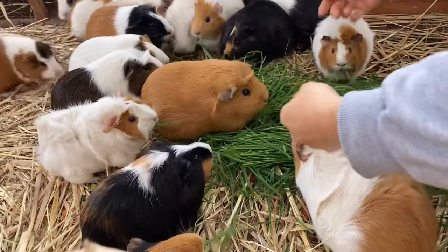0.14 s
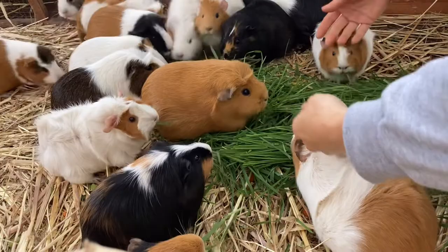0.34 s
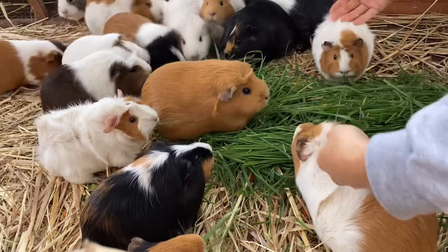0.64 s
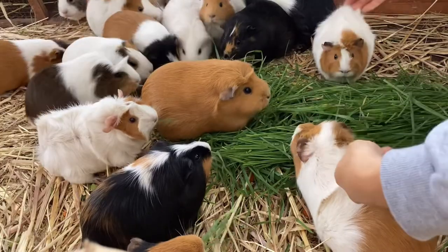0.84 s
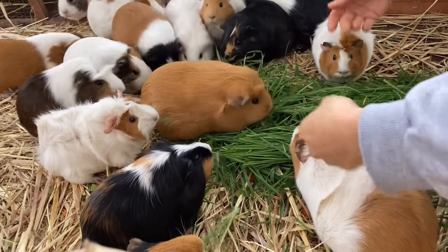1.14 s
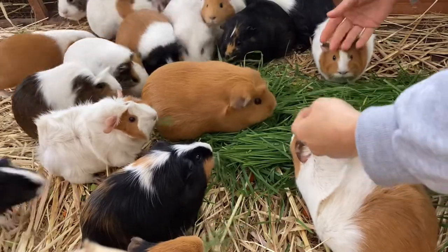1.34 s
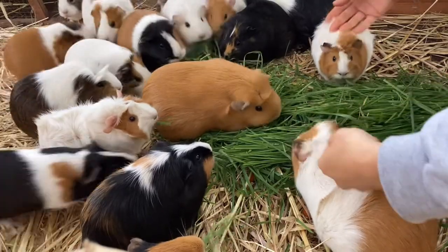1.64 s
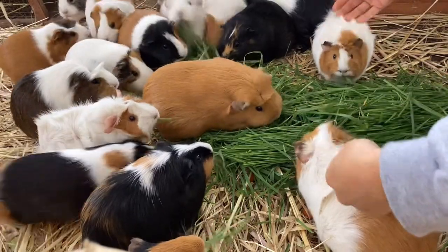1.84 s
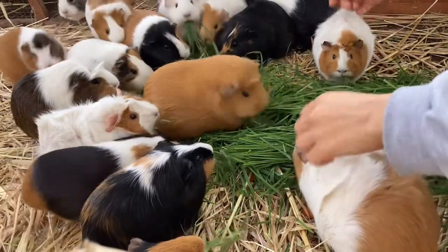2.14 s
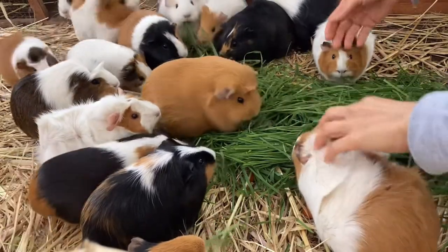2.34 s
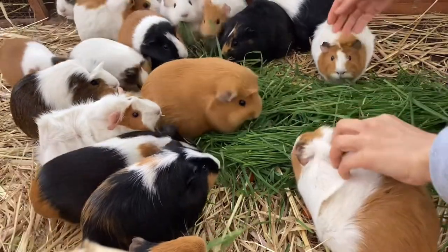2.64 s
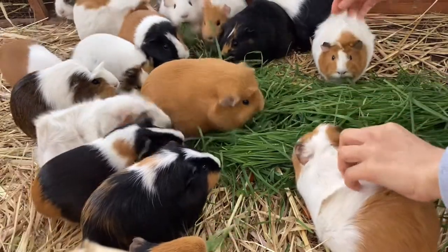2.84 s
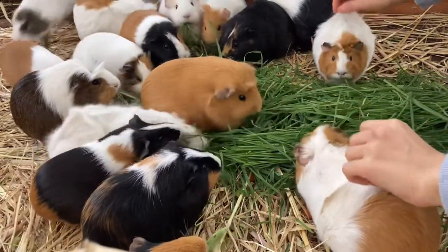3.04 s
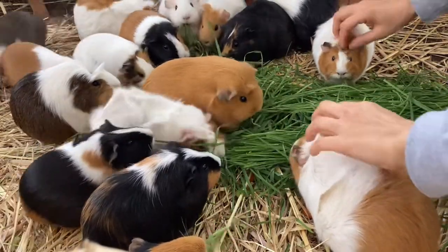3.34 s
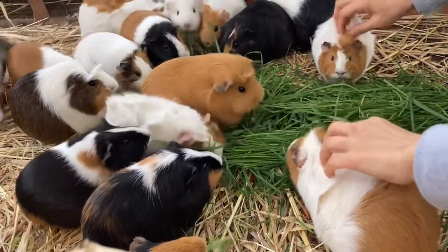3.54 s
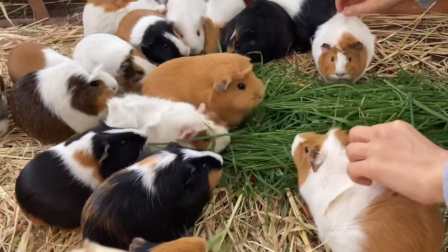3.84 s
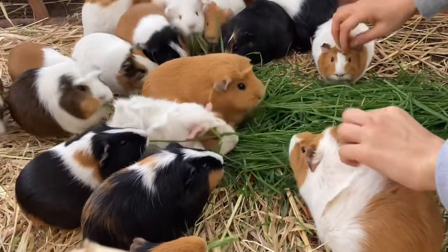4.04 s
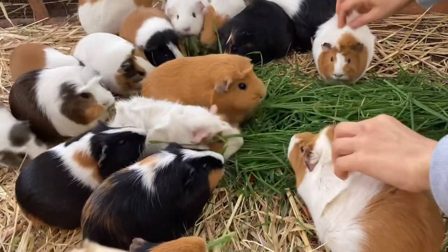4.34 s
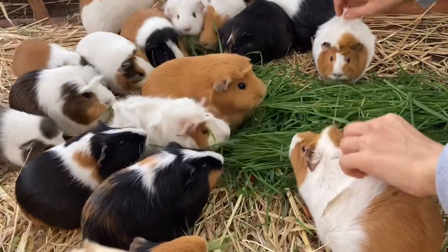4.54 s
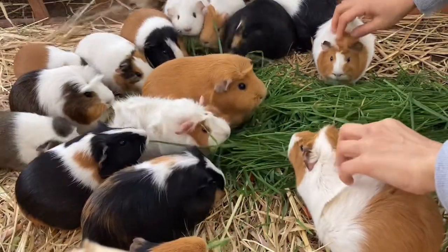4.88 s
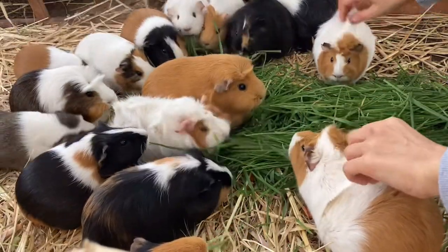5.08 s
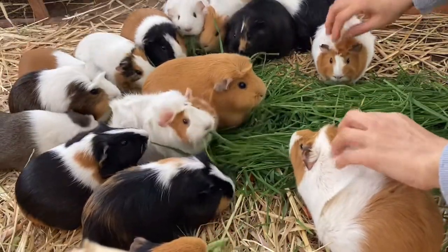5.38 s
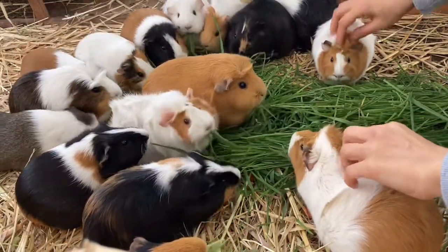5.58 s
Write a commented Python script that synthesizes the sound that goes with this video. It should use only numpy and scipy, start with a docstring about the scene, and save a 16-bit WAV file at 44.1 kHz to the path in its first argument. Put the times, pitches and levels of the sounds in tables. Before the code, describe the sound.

Close stereo pickup of a guinea pig herd in a straw pen outdoors. Low rolling purrs sound at the start, before one second, around two and around three. Faint mutters thicken in the middle, dry stalks crack, wind rumbles and thumps, grass briefly tears, and cloth scuffs strongly near the end.

```python
"""A guinea pig purrs in four short trains of low throat pulses, each a brief tone that swells and rises in pitch.
It is outdoors on straw and grass, close to a small stereo microphone; others mutter in gliding notes and squeak softly.
Straw rustles as coloured noise with tiny cracks, and snaps, clicks and tears in short bursts.
A sleeve brushes as fluttering noise, loudest near the end; two dull bumps ring the microphone housing.
Low noise and slow swings make the wind on the microphone, over a faint two-tone drone and quiet air."""
import sys
import numpy as np
from scipy import signal
from scipy.fft import rfft, irfft
from scipy.io import wavfile
from scipy.ndimage import uniform_filter1d

SR = 44100
rng = np.random.default_rng(int(sys.argv[2]) if len(sys.argv) > 2 else 0)


def digitize_waveform(pressure):
    """Quantize a signal to 16-bit integers and store it at the path in sys.argv[1].

    Rows of a 2-D input are taken as channels; values are limited to [-1, 1].
    """
    field = np.atleast_2d(pressure).T
    bounded = np.clip(field, -1, 1)
    quanta = np.round(bounded * 32767).astype(np.int16)
    wavfile.write(sys.argv[1], SR, quanta)


N = 251811
TIME = np.arange(N) / SR
HZ = np.fft.rfftfreq(N, 1 / SR)

# Throat pulses in four trains: (time at the crest [s], relative level [dB], pitch [Hz], length [s])
PURR_PULSES = [(0.038, -39.5, 337, 0.037), (.105, -42, 371, 0.023), (.179, -42, 351, 0.038),
               (0.716, -45, 350, .027), (0.738, -51.5, 367, 0.056), (0.763, -42, 347, .022),
               (0.82, -41, 359, 0.029), (.878, -40.5, 366, 0.025), (0.938, -43, 376, 0.032),
               (1.003, -43.5, 368, .031), (1.801, -56, 366, 0.027), (1.859, -49.5, 389, 0.027),
               (1.916, -49.5, 365, .029), (1.974, -40.5, 343, 0.027), (2.03, -40.5, 346, 0.03),
               (2.081, -51, 380, 0.027), (2.097, -38.5, 331, .024), (2.156, -44, 360, 0.029),
               (2.221, -46.5, 351, .038), (2.281, -47, 361, .026), (2.782, -48.5, 350, 0.023),
               (2.836, -46.5, 362, 0.024), (2.894, -41.5, 350, 0.024), (2.953, -40, 353, 0.025),
               (3.010, -42.5, 353, 0.032), (3.074, -54, 383, 0.027), (3.151, -58.5, 370, .025)]
PURR_JITTER = .045  # rms share of the pitch
PURR_SECOND_DB, PURR_THIRD_DB = -25, -28  # harmonics against the first
PURR_RASP_DB, PURR_WET_DB = -17, -10

# Soft muttered notes: (start [s], length [s], relative level [dB], mid pitch [Hz],
# glide [octaves], hoarseness [0-1])
MUTTER_NOTES = [(0.303, 0.039, -54.5, 608, -0.73, 0.7), (1.595, 0.019, -44, 340, 0.58, 0.4),
                (1.604, 0.018, -46, 648, -0.24, 0), (1.604, 0.02, -54, 1030, -0.34, 0.4),
                (1.641, 0.051, -54, 624, -0.39, 0.65), (2.166, 0.04, -50.5, 470, -0.38, 0.25),
                (2.438, 0.02, -45, 316, 0.32, 0.34), (2.567, 0.035, -51.5, 669, -0.61, 0.2),
                (2.599, 0.04, -52, 680, -0.33, 0.4), (2.688, 0.05, -54, 915, 0.83, 0.2),
                (2.728, 0.033, -56, 1190, -0.037, 0.5), (2.943, 0.031, -51.5, 840, -0.45, 0.3),
                (2.972, 0.067, -59.5, 1150, .35, 0.77), (3.088, 0.057, -65, 770, .35, .2),
                (3.194, 0.026, -52.5, 383, 0.54, 0), (3.232, 0.069, -56, 320, 0.039, 0.2),
                (3.254, 0.063, -59.5, 980, .03, 0.3), (3.286, .024, -60, 1165, 0.064, .1),
                (3.277, 0.089, -65, 690, -.18, 0), (3.426, 0.054, -54.5, 630, -0.64, 0),
                (3.467, 0.037, -54.5, 312, -0.063, 0), (3.468, 0.056, -58, 670, 0.49, 0),
                (3.473, 0.056, -56, 985, 0.18, 0.5), (3.572, 0.044, -66, 820, 0.23, 0.4),
                (3.589, 0.033, -49, 434, 0.4, 0), (3.65, .045, -66, 920, 0.52, 0),
                (3.786, 0.075, -54.5, 695, 0.1, 0.14), (3.806, 0.052, -67, 1390, .15, 0.2),
                (3.853, 0.03, -55, 1100, 0.57, 0.07), (3.872, 0.038, -55, 1140, -0.25, 0.25),
                (3.902, 0.051, -57.5, 1140, -0.097, 0.2), (3.916, 0.038, -57.5, 745, -0.066, .2),
                (4.033, 0.035, -59, 770, -0.4, 0.1), (4.042, 0.037, -69, 1150, .4, .2),
                (4.137, 0.032, -56, 308, 0.69, 0.1), (4.159, 0.025, -50, 502, -0.17, 0.1),
                (4.197, 0.037, -64, 670, 0.34, 0.3), (4.406, 0.052, -60, 962, 0, 0.7),
                (4.515, 0.079, -55.5, 630, -0.62, 0.3), (5.55, 0.043, -48, 330, -.1, .3)]
# Swell of a muttered note: (share of the note [0-1], loudness [gain])
NOTE_SHAPE = [(0, 0.35), (.25, 0.7), (.6, 1), (1, 0)]
NOTE_BEND = 0.053  # octaves by which the ends of a note lie below its straight glide
MUTTER_JITTER, MUTTER_WAVER = .012, .014  # fast and slow pitch shake, rms share of the pitch
HOARSE_WIDTH_HZ = 110
MUTTER_THIRD_DB = -9  # third harmonic against the second
THROAT_BUZZ = .42  # depth of the throat beat
MUTTER_WET_DB = -10.5
# Faint notes from the rest of the herd
CHATTER_START_S, CHATTER_END_S, CHATTER_PER_S, CHATTER_NOTE_S = 2.55, 4.55, 14, 0.045
CHATTER_DB, CHATTER_HZ, CHATTER_OCTAVES = -73, 795, 0.53  # relative level, middle pitch, spread each way

# Thin breathy squeaks: (start [s], length [s], relative level [dB], pitch [Hz], width [Hz])
SQUEAKS = [(0.22, 0.11, -61, 3240, 260), (0.287, 0.075, -66, 2420, 600)]

# The herd's stirring in the straw: (time [s], relative level [dB])
STIR_LEVEL = [(0, -61.5), (.3, -65.5), (.6, -59.5), (1.1, -64), (1.4, -62), (2.4, -62.5), (2.7, -67.5),
              (3.1, -76.5), (3.35, -62), (3.82, -76), (4.1, -67), (4.55, -71.5), (4.75, -65.5),
              (5.1, -71.5), (5.71, -71.5)]
# Single shuffles in the straw: (time at the loudest [s], half length [s], relative level [dB])
SHUFFLES = [(0.025, 0.026, -61.5), (0.161, 0.022, -57.5), (0.478, 0.08, -57.5), (0.873, 0.1, -61),
            (1.22, 0.029, -56.5), (1.324, 0.034, -56.5), (1.625, 0.016, -55.5), (2.248, 0.031, -56.5),
            (2.913, 0.14, -62), (3.22, 0.063, -64), (3.615, 0.054, -57.5), (3.941, 0.029, -59.5),
            (4.086, 0.021, -61.5), (4.25, 0.03, -62.5), (4.359, 0.046, -61), (5.145, 0.027, -58.5),
            (5.406, 0.098, -60)]
# Spectrum of rustling stalks: (frequency [Hz], relative density [dB])
RUSTLE_COLOUR = [(300, -2.5), (1000, -5.5), (2200, -7.5), (4500, -6), (6500, -8.5), (8000, 0.5),
                 (10000, -2), (12000, 1), (14000, -6.5), (16000, -1.5)]
CRACKLES_PER_S, CRACKLE_SHARE = 160, .6

# Straws that snap: (time [s], peak level [dB], low knock against the crack [dB])
STRAW_SNAPS = [(.074, -50, -12), (.365, -55, 3), (0.448, -41, -24), (.618, -40, -7), (.791, -42.5, 16),
               (.796, -50, 2), (.864, -33.5, -27), (1.301, -40, -10), (1.407, -35, -15), (1.411, -42, -18),
               (1.413, -44, -5), (1.478, -41, -20), (1.520, -41, 4), (1.527, -31, -6.5), (1.604, -35, -15),
               (1.651, -39, -6), (1.660, -29.5, -11), (1.862, -43, 6), (1.906, -35, -8), (2.164, -43, -10),
               (2.561, -44, -9), (2.629, -50, -13), (2.749, -49, -8), (2.814, -51, 0), (2.971, -41.5, 1),
               (2.977, -38, -14), (2.980, -34.5, -18), (3.039, -43, -7), (3.368, -42, -17),
               (3.412, -46, -1), (3.658, -43, -17), (3.881, -52, -13), (4, -36.5, -32), (4.089, -43, -9),
               (4.328, -43.5, -5), (4.746, -42, -9), (4.803, -41, -14), (4.819, -41, -12),
               (4.941, -44, -10), (4.980, -39, -3), (5.146, -44, -5), (5.242, -43, -15), (5.351, -54, -6),
               (5.685, -45, 6)]
TICKS_PER_S, TICK_DB, TICK_KNOCK_DB = 4, -50.5, -6  # lesser stalks give way at random
CREAK_S, CREAK_DB, CRACK_S = .007, -23, .00052  # build-up of the creak, decay of the crack

# Pitched clicks of hollow stalks: (time [s], level [dB], pitch [Hz], time to the envelope peak [s])
STALK_CLICKS = [(1.1492, -52, 3590, 0.00085), (1.3001, -53.5, 2480, 0.00056), (2.5602, -59, 3560, 0.0009),
                (2.8206, -47.5, 3190, .0006), (4.328, -64, 2640, 0.00072)]

# A tuft of grass tears: (time [s], level [dB])
TEAR_LEVEL = [(4.79, -90), (4.805, -52.5), (4.96, -57), (4.99, -90)]
# Spectrum of the tear: (frequency [Hz], relative density [dB])
TEAR_COLOUR = [(1000, -22), (3000, -7.5), (6000, -4), (8500, 2), (11500, 8.5), (15500, -0.5)]
FIBRES_PER_S, TEAR_HISS = 380, .55

# Slide of hand and sleeve, close near the end: (time [s], relative level [dB], brightness [dB/octave])
SLIDE = [(0, -59, 1.5), (.35, -66, 5), (1.1, -69.5, 6), (2.7, -62.5, 1), (3.7, -78.5, 5.5),
         (4.35, -80.5, 6.5), (4.6, -57, 1.5), (4.78, -60.5, 2), (4.85, -54, 1.5), (5, -49, 1.5),
         (5.12, -48.5, -0.5), (5.25, -51.5, 1), (5.35, -51, 0.5), (5.52, -55, 0.5), (5.71, -51.5, 1)]
# Catches and scuffs of cloth: (time at the loudest [s], half length [s], relative level [dB],
# brightness [dB/octave])
SCUFFS = [(0.32, 0.028, -60, 4.5), (0.731, 0.011, -59, 0), (1.843, 0.021, -56, -1.5),
          (2.24, 0.015, -66, 16.5), (4.424, 0.01, -49.5, 0), (4.476, 0.028, -50, 0.5),
          (4.67, 0.019, -52.5, 1), (4.718, 0.024, -50.5, -0.5), (4.812, 0.0051, -50.5, -1),
          (4.867, 0.018, -58, 6), (4.976, 0.012, -54, 7.5), (5.131, 0.0061, -44, 0),
          (5.153, 0.011, -39.5, -0.1), (5.196, 0.019, -43, 0), (5.205, 0.007, -42.5, 2),
          (5.295, 0.011, -53.5, 5.5), (5.411, 0.042, -45.5, 4), (5.416, 0.0071, -44, 4.5),
          (5.58, 0.025, -58, -8), (5.627, .005, -51.5, 0), (5.66, 0.0046, -60, -3), (5.687, 0.0031, -50, 4)]
# Place of the rubbing, from a little left to close on the right: (time [s], lag of the left port [ms])
BEARING = [(3.4, -0.254), (4.3, 0.431)]
# Spectrum of cloth before the brightness tilt: (frequency [Hz], relative density [dB])
CLOTH_COLOUR = [(30, -9), (70, -20), (120, -2.5), (200, 0.5), (330, 4), (600, -4), (1000, -7.5),
                (1500, -11.5), (2800, -19), (4000, -24.5), (7000, -31.5), (16000, -62)]
# Likeness of the two ports for cloth: (frequency [Hz], left-right correlation [0-1])
CLOTH_LIKENESS = [(60, 0.82), (300, 0.87), (700, 1), (1400, 0.0019), (3000, 0.017), (6000, 0.99)]
CATCHES_PER_S, CATCH_SHARE, CRUNCH_DB = 700, .5, 1.8

# Dull bumps against the microphone: (time [s], relative strength [dB])
BUMPS = [(0.762, -8), (5.148, -0.5)]
# Modes of the microphone housing: (frequency [Hz], relative level [dB], time to the envelope peak [s])
HOUSING = [(126, -31, 0.0036), (287, -36.5, 0.0044)]

# Strength of the wind: (time [s], relative level [dB])
WIND_LEVEL = [(0, -58.5), (.33, -53.5), (.45, -54.5), (.78, -48), (.86, -55.5), (1.3, -60), (2.15, -55.5),
              (2.5, -58), (2.95, -54), (3.1, -60.5), (3.38, -62.5), (3.53, -69), (3.78, -62), (4.3, -62.5),
              (5.4, -55.5), (5.71, -60.5)]
# Spectrum of the wind rumble: (frequency [Hz], relative density [dB])
RUMBLE_COLOUR = [(10, -52), (20, -38), (32, -25), (45, -0.5), (67, 2), (90, -1), (125, -4.5), (160, -14),
                 (210, -17), (350, -32), (700, -27), (1500, -110)]
# Eddies that thump the microphone: (time [s], relative level [dB], frequency [Hz],
# reach to either side [cycles])
EDDIES = [(0.26, -45, 67, 0.96), (.407, -31.5, 67.5, 0.48), (.472, -37, 62, 1.1), (0.523, -37.5, 67, 1.5),
          (0.589, -40, 75, 0.65), (.657, -31, 70, 0.67), (.738, -35, 76, 1.1), (.77, -33, 71, 0.82),
          (2.798, -44, 63.4, 0.76), (3.35, -46.5, 50.5, 1.6), (3.417, -41, 60.6, 1.2),
          (3.784, -48, 61, 0.55), (4.021, -45.5, 66, 0.74), (4.049, -45.5, 67.6, 1.1),
          (4.449, -39.5, 80.6, 0.88)]

# Faint low drone: (time [s], level of the lower tone [dB])
DRONE_LEVEL = [(0, -65), (1.0, -65), (1.3, -69), (1.6, -62.5), (2.95, -68.5), (3.1, -77.5), (5.71, -71)]

# Spectrum of the outdoor background: (frequency [Hz], relative density [dB])
AIR_COLOUR = [(30, 9.5), (100, 4), (160, -9), (250, -3.5), (400, -0.5), (700, -5.5), (1200, -9.5),
              (2200, -25), (5000, -37), (16000, -14.5)]
# Likeness of the two ports for air, rustle and tear: (frequency [Hz], left-right correlation [0-1])
AIR_LIKENESS = [(60, 0.63), (300, 0.84), (700, 0.027), (1500, 0.53), (3000, 0.027), (6000, 0.0045)]
AIR_DB, AIR_SWAY_DB = -63, 1.5

PORT_DELAY_S = .000305
EDGE_HZ = 15850  # upper band limit


def amp(db):
    """Decibels to gain."""
    return 10 ** (np.asarray(db) / 20)


def unit(x):
    """Scales to rms 1."""
    return x / np.sqrt(np.mean(x ** 2) + 1e-20)


def read(points, hz):
    """Reads a spectrum table on a log-frequency axis."""
    f, value = np.transpose(points)
    return np.interp(np.log(hz + 1), np.log(f + 1), value)


def curve(rows, axis=1):
    """Reads one column of a time table at every sample."""
    rows = np.asarray(rows)
    return np.interp(TIME, rows[:, 0], rows[:, axis])


def add(mix, s, sound):
    """Mixes a sound in at time s."""
    part = mix[..., max(round(s * SR), 0):][..., :sound.shape[-1]]
    part += sound[..., :part.shape[-1]]


def arch(s, half_s):
    """A smooth swell of height 1 around time s."""
    return np.exp(-((TIME - s) / half_s) ** 2 / 2)


def wander(rate_hz):
    """Smooth random signal of rms 1, with little movement faster than the rate."""
    return unit(irfft(rfft(rng.standard_normal(N)) * np.exp(-(HZ / rate_hz) ** 2), N))


def fuzzy(width_hz):
    """Complex random signal that widens a pure tone into a band."""
    return wander(width_hz) + 1j * wander(width_hz)


def cracks(per_s):
    """Tiny clicks at random moments, most of them weak, at both ports; rms 1."""
    sizes = amp(4 * np.minimum(rng.exponential(1, N), 3.2))
    sizes = sizes * (rng.random(N) < per_s / SR)
    return unit(sizes * rng.choice([-1, 1], (2, N)))


def patches(z, bins, frames):
    """Random patches of rms 1 over a short-time spectrum."""
    noise = rng.standard_normal(z.shape[1:])
    return unit(uniform_filter1d(uniform_filter1d(noise, bins, axis=0), frames, axis=1))


def coloured(pair, colour, likeness):
    """Gives two unrelated signals a spectrum and a left-right correlation; rms 1."""
    a, b = rfft(pair)
    same = np.clip(read(likeness, HZ), -1, 1)
    spectra = np.array([a, same * a + np.sqrt(1 - same ** 2) * b])
    return unit(irfft(spectra * amp(read(colour, HZ)), N))


def ring(hz, ring_s):
    """A heavily damped mode whose envelope peaks at height 1 after ring_s and soon dies."""
    t = TIME[:SR // 10]
    return np.sin(2 * np.pi * hz * t) * t / ring_s * np.exp(1 - t / ring_s)


def placed(x, lag_ms):
    """A source on the right reaches the left port later."""
    left = irfft(rfft(x) * np.exp(-2j * np.pi * HZ * lag_ms / 10 ** 3), N)
    return np.array([left, x])


def pen(x, t60):
    """Scattered reflections from the boards of the pen, different at each port."""
    t = TIME[:SR // 2]
    taps = rng.standard_normal((2, len(t))) * (rng.random((2, len(t))) < .05) * (t > .004)
    taps *= 10 ** (-3 * t / t60)
    return signal.fftconvolve(x[None], taps / np.linalg.norm(taps[0]), axes=1)[:, :N]


def purr(rise=0.404, crest=.6, level_db=0):
    """About 17 pulses a second in each train, each some ten cycles of a round tone that swells and rises."""
    out = np.zeros(N)
    shake = 1 + PURR_JITTER * wander(120)
    # a little air passes with each pulse and roughens it
    throat_band = signal.butter(2, [280, 620], "band", fs=SR, output="sos")
    air_leak = unit(signal.sosfilt(throat_band, rng.standard_normal(N)))
    for s, db, hz, length in PURR_PULSES:
        u = np.linspace(0, 1, int(length * SR))
        swell = np.sin(np.pi * np.interp(u, [0, crest, 1], [0, .5, 1])).clip(0) ** 2
        now = int(s * SR) + np.arange(len(u))
        pitch = hz * (1 + rise * (u - crest)) * shake[now]
        phase = 2 * np.pi * np.cumsum(pitch) / SR
        folds = np.sin(phase)
        folds = folds + amp(PURR_SECOND_DB) * np.sin(2 * phase) + amp(PURR_THIRD_DB) * np.sin(3 * phase)
        pulse = swell * (folds + amp(PURR_RASP_DB) * air_leak[now])
        add(out, s - crest * length, amp(db + level_db) * pulse)
    return placed(out, lag_ms=0.16) + amp(PURR_WET_DB) * pen(out, t60=.3)


def mutters(second_db=-17, buzz_hz=215, level_db=-2):
    """Animals farther off make quick glides, some clear and some hoarse."""
    out = np.zeros(N)
    shake = 1 + MUTTER_JITTER * wander(340) + MUTTER_WAVER * wander(40.0)
    fuzz = fuzzy(HOARSE_WIDTH_HZ)
    for s, length, db, hz, glide, hoarse in MUTTER_NOTES + chatter():
        u = np.linspace(0, 1, int(length * SR))
        now = int(s * SR) + np.arange(len(u))
        octaves = glide * (u - .5) - NOTE_BEND * (2 * u - 1) ** 2
        pitch = hz * 2 ** octaves * shake[now]
        turn = np.exp(2j * np.pi * np.cumsum(pitch) / SR)
        swell = np.interp(u, *np.transpose(NOTE_SHAPE))
        # the nearly shut mouth favours the overtones of low notes
        overtone = amp(second_db) * np.minimum(700 / pitch, 1.4) ** 2
        voice = turn + overtone * (turn ** 2 + amp(MUTTER_THIRD_DB) * turn ** 3)
        grain = np.sqrt(max(1 - hoarse ** 2, 0)) + hoarse * fuzz[now] / np.sqrt(2)
        note = unit((grain * voice).real) / np.sqrt(2)
        add(out, s, amp(db) * swell * note)
    # a slower beat in the throat puts side tones around each note
    out = out * (1 + THROAT_BUZZ * np.sin(2 * np.pi * np.cumsum(buzz_hz * shake) / SR))
    return amp(level_db) * (out + amp(MUTTER_WET_DB) * pen(out, t60=0.17))


def chatter(hoarse=0.71):
    """Faint notes at random times and pitches, laid out like the muttered notes."""
    count = round(CHATTER_PER_S * (CHATTER_END_S - CHATTER_START_S))
    notes = []
    for when, high, glide in rng.uniform(-1, 1, (count, 3)):
        s = np.interp(when, [-1, 1], [CHATTER_START_S, CHATTER_END_S])
        hz = CHATTER_HZ * 2 ** (CHATTER_OCTAVES * high)
        notes.append((s, CHATTER_NOTE_S, CHATTER_DB, hz, glide / 2, hoarse))
    return notes


def squeaks(level_db=-1, onset=0.11):
    """Air forced through a tight throat: a fuzzy whistle that starts quickly and fades."""
    out = np.zeros(N)
    for s, length, db, hz, width in SQUEAKS:
        u = np.linspace(0, 1, int(length * SR))
        fuzz = fuzzy(width / 2)[:len(u)]
        tone = unit((fuzz * np.exp(2j * np.pi * hz * length * u)).real)
        add(out, s, amp(db + level_db) * tone * np.interp(u, [0, onset, 1], [0, 1, 0]))
    return out + amp(1.0) * pen(out, t60=0.28)


def rustle(hiss=1.0, clump_db=1.5, patchy_db=3.0, level_db=3.5):
    """Stalks and fur slide over each other: a fine hiss with clumps of tiny cracks."""
    grains = cracks(2500) + CRACKLE_SHARE * cracks(CRACKLES_PER_S)
    grains = grains + hiss * rng.standard_normal((2, N))
    z = signal.stft(grains * amp(clump_db * wander(44)), SR, nperseg=256)[2]
    # each stalk has its own pitch, so the colour shifts from moment to moment
    shifts = patches(z, 8, 12)
    grains = signal.istft(z * amp(patchy_db * shifts), SR, nperseg=256)[1][:, :N]
    power = amp(curve(STIR_LEVEL)) ** 2
    for s, half, db in SHUFFLES:
        power = power + (amp(db) * arch(s, half)) ** 2
    return coloured(grains, RUSTLE_COLOUR, AIR_LIKENESS) * np.sqrt(power) * amp(level_db)


def snaps(splinter_s=0.016, splinter_db=-21, level_db=0):
    """A stalk creaks as it bends, cracks in one sharp click, and splinters for some milliseconds."""
    out = np.zeros((2, N))
    t = np.arange(-SR // 60, SR // 25) / SR
    before = amp(CREAK_DB) * np.exp(-abs(t) / CREAK_S)
    after = np.exp(-abs(t) / CRACK_S) + amp(splinter_db) * np.exp(-abs(t) / splinter_s)
    fibres = np.where(t >= 0, after, before)
    high = signal.butter(2, [5800, 12500], "band", fs=SR, output="sos")
    low = signal.butter(2, [1700, 5000], "band", fs=SR, output="sos")
    tick_times = rng.uniform(0, N / SR, round(TICKS_PER_S * N / SR))
    ticks = [(s, TICK_DB, TICK_KNOCK_DB) for s in tick_times]
    for s, db, knock in STRAW_SNAPS + ticks:
        # one part is common to both ports, the other separate
        burst = fibres * (rng.choice([-1, 1], len(t)) + .5 * rng.standard_normal((2, len(t))))
        crack = signal.sosfilt(high, burst) + amp(knock) * signal.sosfilt(low, burst)
        add(out, s + t[0], amp(db + level_db) * crack / abs(crack).max())
    return out


def stalk_clicks(level_db=0, wet_db=-9):
    """A hollow stalk gives way and rings for a few cycles; the pen answers."""
    out = np.zeros(N)
    for s, db, hz, ring_s in STALK_CLICKS:
        add(out, s, amp(db + level_db) * ring(hz, ring_s))
    return out + amp(wet_db) * pen(out, t60=0.087)


def tear():
    """Blades of grass part fibre by fibre in a short bright rip."""
    fibres = cracks(FIBRES_PER_S) + TEAR_HISS * rng.standard_normal((2, N))
    return coloured(fibres, TEAR_COLOUR, AIR_LIKENESS) * amp(curve(TEAR_LEVEL))


def brush(flutter_db=1.5, pivot_hz=500, right_db=1.0, level_db=-2.5):
    """Cloth slides in small catches: a fluttering scuff whose brightness follows the strongest rubbing."""
    powers = [amp(curve(SLIDE)) ** 2]
    tilts = [curve(SLIDE, axis=2)]
    for s, half, db, bright in SCUFFS:
        powers.append((amp(db) * arch(s, half)) ** 2)
        tilts.append(np.full(N, bright))
    powers = np.array(powers)
    cloth = rng.standard_normal((2, N)) + CATCH_SHARE * cracks(CATCHES_PER_S)
    left, right = coloured(cloth, CLOTH_COLOUR, CLOTH_LIKENESS)
    left = np.interp(TIME - curve(BEARING) / 10 ** 3, TIME, left)
    hz, t, z = signal.stft(np.array([left, right]), SR, nperseg=512)
    tilt = np.interp(t, TIME, np.average(np.array(tilts), axis=0, weights=powers))
    z = z * amp(np.log2(np.clip(hz / pivot_hz, .5, 10))[:, None] * tilt)
    # folds crumple, each with its own colour
    folds = patches(z, 14, 2)
    noise = signal.istft(z * amp(CRUNCH_DB * folds), SR, nperseg=512)[1][:, :N]
    loudness = np.sqrt(powers.sum(0)) * amp(flutter_db * wander(22) + level_db)
    return noise * loudness * amp([[-right_db], [right_db]])


def bumps():
    """A nudge reaches both ports through the housing as one compact thud."""
    out = np.zeros(N)
    thud = sum(amp(db) * ring(hz, ring_s) for hz, db, ring_s in HOUSING)
    for s, db in BUMPS:
        add(out, s, amp(db) * thud)
    return out


def rumble(level_db=1.5, thump_db=-1):
    """Lumpy low wind; the largest eddies push the diaphragms to and fro a few times at most."""
    noise = coloured(rng.standard_normal((2, N)), RUMBLE_COLOUR, [(40, .75), (300, .8)])
    # even out the slow lumps so that the wind table sets the level
    noise = noise / np.sqrt(uniform_filter1d((noise ** 2).mean(0), SR // 7))
    out = noise * amp(curve(WIND_LEVEL) + level_db)
    t = np.arange(-SR // 20, SR // 20) / SR
    for s, db, hz, cycles in EDDIES:
        swing = np.sin(2 * np.pi * hz * t) * np.exp(-(hz * t / cycles) ** 2)
        add(out, s + t[0], amp(db + thump_db) * swing)
    return out


def drone(hz=154, width_hz=9, upper_hz=228, upper_db=-7):
    """A faint low drone in the distance: two narrow bands of noise that waver like unsteady tones."""
    low = unit((fuzzy(width_hz) * np.exp(2j * np.pi * hz * TIME)).real)
    high = unit((fuzzy(width_hz) * np.exp(2j * np.pi * upper_hz * TIME)).real)
    return (low + amp(upper_db) * high) * amp(curve(DRONE_LEVEL))


def air(right_db=0.5):
    """The quiet outdoor background: coloured noise that sways gently in level."""
    noise = coloured(rng.standard_normal((2, N)), AIR_COLOUR, AIR_LIKENESS)
    return noise * amp(AIR_DB + AIR_SWAY_DB * wander(10.4)) * amp([[-right_db], [right_db]])


def scene():
    """Animals, straw, grass, sleeve, wind and background."""
    animals = purr() + mutters() + squeaks()
    straw = rustle() + snaps() + stalk_clicks() + tear()
    microphone = brush() + bumps() + rumble()
    return animals + straw + microphone + drone() + air()


def record(dry, split_hz=5700):
    """In the treble both channels carry mostly one signal, the right one inverted and late; then the band limit."""
    left, right = rfft(dry)
    same = .92 / (1 + np.exp(-(HZ - split_hz) / 350))
    late_left = left * np.exp(-2j * np.pi * HZ * PORT_DELAY_S)
    right = np.sqrt(1 - same ** 2) * right - same * late_left
    edge = signal.firwin(511, EDGE_HZ, window=("kaiser", 9), fs=SR)
    return signal.oaconvolve(irfft(np.array([left, right]), N), edge[None], "same")


dry = scene()
out = record(dry)
digitize_waveform(out)
```